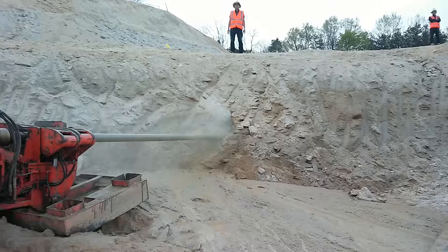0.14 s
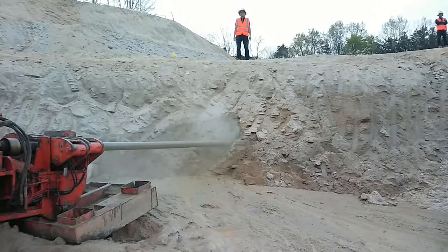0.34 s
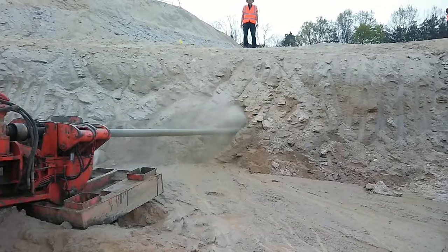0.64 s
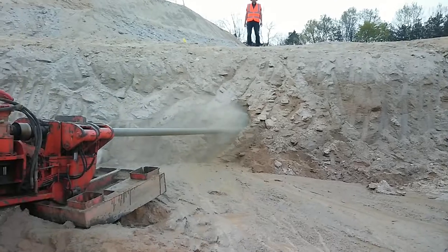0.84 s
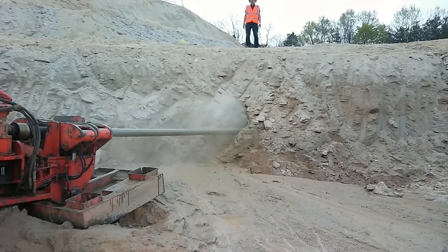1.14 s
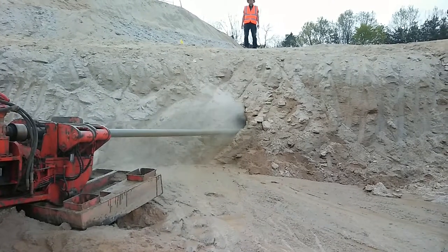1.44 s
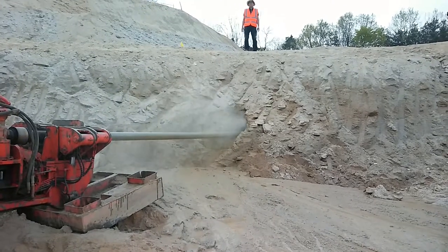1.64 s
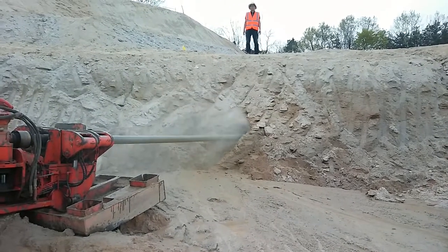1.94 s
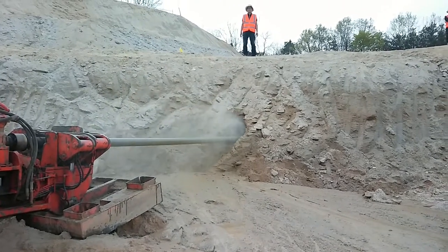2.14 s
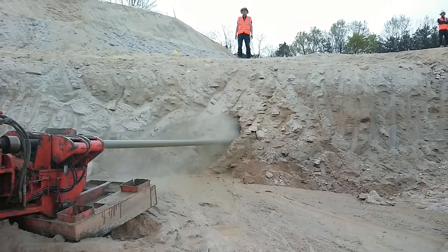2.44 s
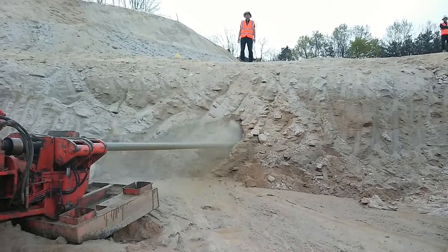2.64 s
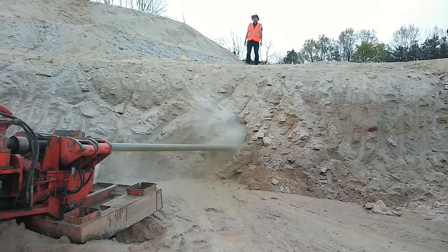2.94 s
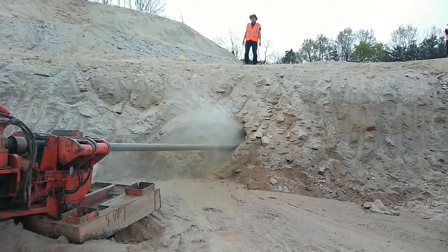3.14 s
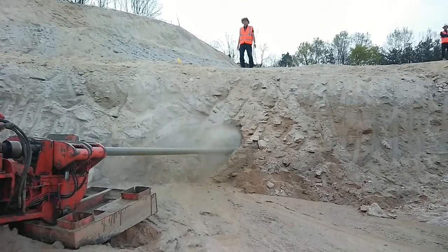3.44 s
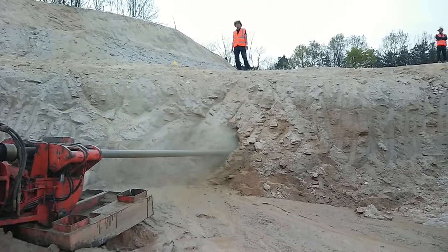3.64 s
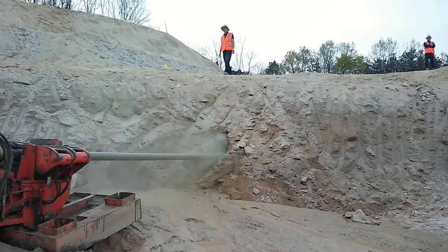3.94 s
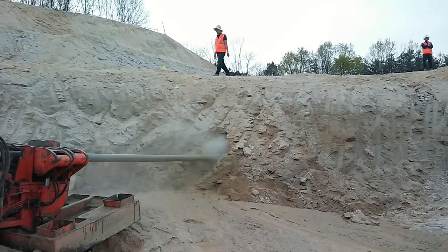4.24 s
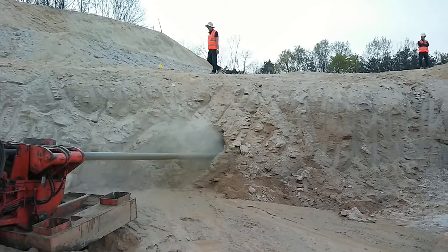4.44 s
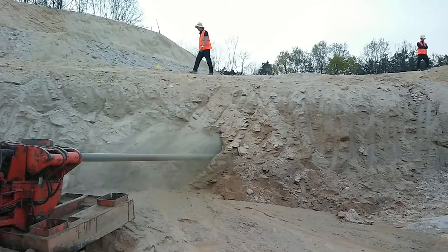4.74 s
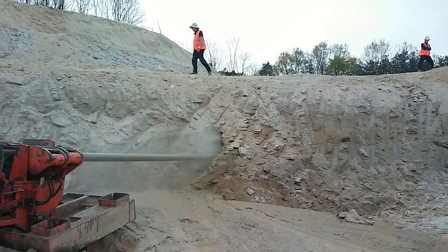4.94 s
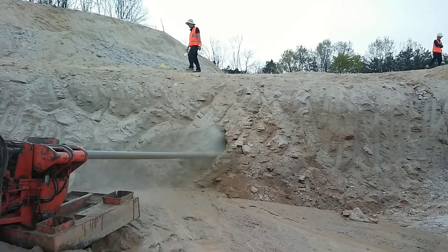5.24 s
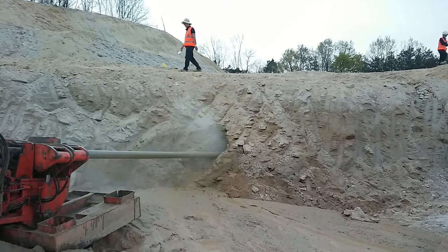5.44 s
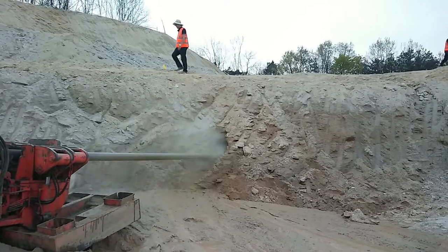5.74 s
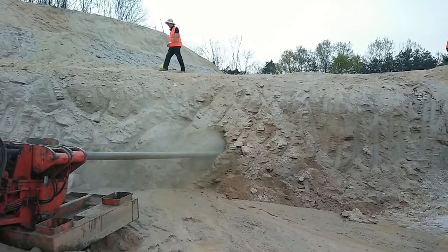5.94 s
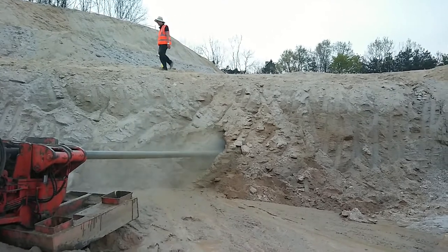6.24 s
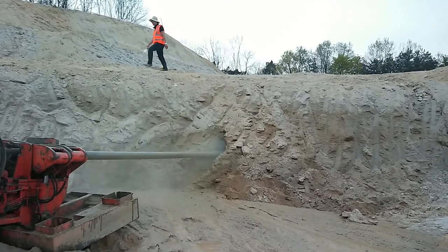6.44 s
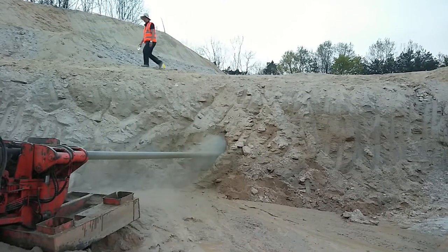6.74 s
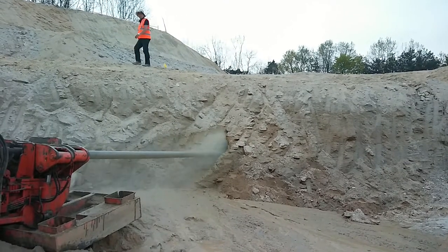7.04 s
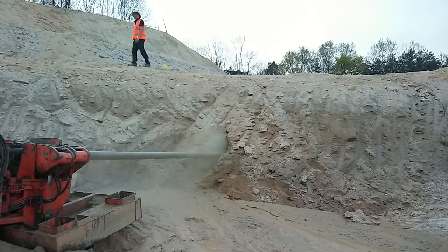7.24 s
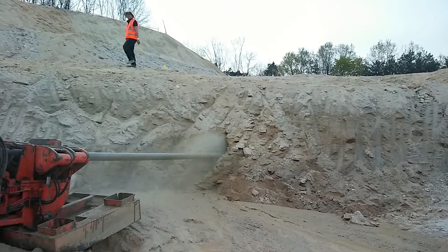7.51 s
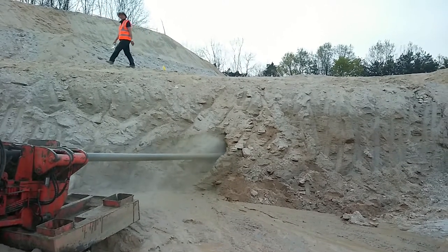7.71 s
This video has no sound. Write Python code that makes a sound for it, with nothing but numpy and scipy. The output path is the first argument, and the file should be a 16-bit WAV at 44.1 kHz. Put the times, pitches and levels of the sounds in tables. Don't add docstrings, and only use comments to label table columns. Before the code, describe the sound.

Starting abruptly, a drilling rig gives a loud continuous roar of compressed air and cuttings over a low diesel hum. Around three seconds the tone shifts, turning grittier and unsteady with short metallic squeals. After five seconds a rapid air hammer thuds underneath, booming deeper near the end. Open pit beside a rock face, one small mono microphone, limited and slightly distorted.

```python
import sys
import numpy as np
from scipy import signal
from scipy.fft import rfft, irfft, next_fast_len
from scipy.io import wavfile
from scipy.ndimage import uniform_filter1d, minimum_filter1d, map_coordinates

SR = 44100
rng = np.random.default_rng(int(sys.argv[2]) if len(sys.argv) > 2 else 0)


def persist_wave(psi):
    counts = np.round(np.clip(psi, -1, 1) * 32767).astype(np.int16)
    wavfile.write(sys.argv[1], SR, np.atleast_2d(counts).T)


def volts_from_decibels(level):
    exponent = np.asarray(level, float) / 20
    return 10 ** exponent


N = 347067

# (time [s], firing rate [Hz], level [dB])
ENGINE = [(.11, 71.5, -27), (.375, 70.3, -28), (.395, 71.1, -20.5), (1.5, 71.1, -21.5), (2.8, 70.3, -22),
          (3.2, 70.5, -20.5), (3.8, 70.34, -23.5), (4.3, 70.5, -24.5), (4.8, 70.1, -22.5), (5.3, 70.8, -24),
          (5.7, 69.9, -22.5), (6.3, 69.6, -33), (7, 67.65, -25.5), (7.87, 69.4, -21)]
# (time [s], level [dB])
FRAME_SHAKE = [(.11, -28), (.5, -22.5), (2.6, -24.5), (3.25, -24.5), (3.5, -18.5), (4, -26.5), (5.3, -23.5),
               (5.6, -25)]
# (frequency [Hz], level [dB per Hz])
FRAME_RUMBLE = [(60, -47), (85, 2.5), (130, -2.5), (180, 2), (240, -2), (330, -6.5), (450, -55)]
GROUND_RUMBLE = [(10, -26), (22, 11), (36, -5), (52, 7), (75, -4), (100, -34)]

# (time [s], pitch [Hz], length [s], level [dB])
SCRAPES = [(2.85, 950, .12, -18), (3.18, 1000, .07, -16), (3.54, 1300, .04, -13), (3.63, 1460, .07, -18),
           (3.68, 1950, .06, -21), (3.75, 4950, .1, -20), (3.74, 2130, .05, -21), (3.79, 2300, .05, -21),
           (3.84, 2450, .06, -21), (4.14, 900, .08, -17), (4.45, 1380, .08, -18), (4.56, 950, .08, -19),
           (4.74, 2200, .04, -20), (4.76, 970, .08, -18), (4.86, 1460, .06, -18), (4.86, 1700, .05, -20),
           (4.89, 2130, .04, -20), (5.03, 3900, .08, -21), (6.06, 4650, .12, -15), (6.3, 4950, .25, -20),
           (6.85, 1200, .12, -18), (7.6, 2100, .25, -22)]

# (time [s], piston cycles [Hz], force [dB])
HAMMER = [
    (5.34, 20.37, -24),
    (5.57, 19.9, -10),
    (5.8, 17.38, -9),
    (5.97, 16.51, -11),
    (6.45, 16.76, -12),
    (6.7, 17.5, -10),
    (7.1, 18.53, -10),
    (7.3, 18.8, -11),
    (7.87, 20.36, -10),
]
# (time [s], half length [s], extra level [dB])
SOLID_ROCK = [
    (5.662, 0.057, 12),
    (6.367, 0.065, 11),
    (6.72, 0.084, 7),
    (7.074, 0.063, 6),
    (7.55, .1, 6),
]
FIRST_STROKE_S = 5.3415
BORE_CLOSES_S, CLOSING_S = 7.29, 0.043

# (frequency [Hz], level [dB per Hz])
RING = [(700, -18), (820, -8.5), (900, -2), (980, 1), (1100, -3), (1200, -10)]
ROAR = [(1000, -11), (1120, -4), (1250, -3.5), (1380, -1.5), (1650, -7), (1850, -8), (2200, -26)]
LOW_MODE = [(240, -18), (320, -2), (480, 3), (620, -1), (730, -11.5), (850, -24)]
HIGH_MODE = [(1500, -24), (1850, -5.5), (2200, -2), (2700, -4), (3000, -11.5), (3500, -25)]
MODE_HZ = [980, 1350, 480, 2300]
# (from time [s], ring [dB], roar [dB], low [dB], high [dB])
HEARD = [
    (0, -24, -20.5, -25.5, -22),
    (3.15, -21.5, -22.5, -23.5, -21),
    (5.8, -21, -20.5, -27, -23),
    (7.58, -24.5, -31.5, -26.5, -20.5),
]
# (time [s], level [dB])
LOAD = [(.11, 1), (1, 0), (2, 0), (2.68, -0.5), (2.81, -2.5), (3.13, 0.5), (3.3, -2.5), (3.45, -1),
        (3.8, -0.5), (4.06, -0.5), (4.6, -1), (5.04, -2.5), (5.45, 0), (5.6, -6.5), (5.74, -6),
        (5.84, -0.5), (7.4, -0.5), (7.87, -1)]
# (time [s], pitch [Hz], length
# [s], swell [dB])
CATCHES = [(6.849, 475.5, 0.77, 4.5), (1.701, 1330, 0.2, 4.5), (2.83, 1120, 0.16, 8), (2.83, 480, 0.1, 5),
           (3.18, 980, 0.19, 4), (3.207, 480, 0.14, 11), (3.378, 480, 0.048, 0), (3.64, 980, .22, -7),
           (3.48, 980, 0.12, 2.5), (3.487, 480, 0.18, 4), (3.535, 1340, 0.14, 9.5),
           (3.734, 2300, 0.18, 3.5), (3.88, 1200, 0.12, 7.5), (4.126, 987, 0.22, 3.5),
           (4.33, 1054, 0.035, 13), (4.352, 2300, 0.08, 8), (4.445, 1130, 0.077, 14), (4.57, 1050, 0.17, 3),
           (4.712, 980, 0.15, 6), (4.853, 1450, 0.13, 8.5), (5.21, 1350, 0.089, 5), (5.318, 900, .1, 2),
           (5.466, 980, 0.053, 4), (6.02, 1350, 0.14, 4.5), (6.32, 1000, .1, 1), (6.445, 1210, 0.16, 1.5),
           (6.857, 1102, 0.29, 7), (7.196, 1030, 0.094, 2), (4.563, 2000, 0.15, -5), (4.85, 450, 0.11, 7)]
CATCH_RISE_S, CATCH_OCTAVES, SHIFT_S = 0.013, .35, 0.19
# (time [s], spread [dB])
UNREST = [(0, .7), (3, .8), (3.3, 1.7), (5.7, 1.8), (7.87, 1.3)]

# (time [s], air flow [dB], grit over the flow [dB])
JET = [(0.11, -11.5, -30.5), (0.37, -14, -31), (0.43, -13.5, -32), (1.13, -9.5, -33.5), (1.28, -13, -32),
       (3.05, -12.5, -33), (3.13, -12.5, -28.5), (3.35, -13.5, -21.5), (3.96, -11.5, -23.5),
       (4.28, -18, -21.5), (4.32, -12, -25), (4.69, -15, -20.5), (5.04, -10, -24), (5.36, -14.5, -22),
       (6.2, -14.5, -26.5), (7.46, -16, -28), (7.85, -16, -36), (7.87, -14, -26)]
# (frequency [Hz], level [dB per Hz])
HISS = [(2500, -18), (3000, -9.5), (3700, -4), (4700, -3.5), (5700, -6.5), (6600, -11.5), (7300, -38),
        (8500, -60)]
EDGE = [(6000, -7), (6800, 0), (7800, -5.5), (8800, -10), (9400, -23), (10500, -56)]
FIZZ = [(8000, -30), (9300, -0.5), (11000, -3.5), (12500, -3), (14000, -5.5), (15600, -11), (17000, -14)]
HISS_DB, EDGE_DB, FIZZ_DB = -1, 16.5, 0.5
CLEAN_DB, LEAN_PER_DB = -30, 0.6

# (delay [ms], gain [1])
ECHOES = [
    [(0.83, -0.07), (1.435, 0.05), (1.665, -0.05), (2.33, 0.04), (2.48, 0.06), (2.885, 0.06)],
    [(0.735, 0.06), (0.87, 0.05), (1.39, 0.04), (1.62, -0.04), (2.18, -0.09), (2.63, -0.04)],
    [(0.58, 0.06), (0.865, 0.13), (0.99, 0.06), (1.55, 0.06), (2.165, -0.09), (2.39, 0.09)],
]
MOVES_S = [
    3.13,
    5.75,
]
START_S, TOP_HZ = .1022, 15650


def unit(x):
    return x / np.sqrt(np.mean(x ** 2) + 1e-20)


def curves(rows):
    s, *cols = np.transpose(rows)
    return [np.interp(np.arange(N) / SR, s, c) for c in cols]


def wobble(rate):
    knots = rng.standard_normal(int(N * rate / SR) + 4)
    return map_coordinates(knots, [np.arange(N) * rate / SR])


def step(s, width_s):
    return .5 + .5 * np.tanh((np.arange(N) / SR - s) / width_s)


def filtered(x, response):
    m = next_fast_len(N + SR // 2)
    return irfft(rfft(x, m) * response(np.fft.rfftfreq(m, 1 / SR)), m)[..., :N]


def rush(spectrum, patchy_db, lean_db=0):
    hz, db = np.transpose(spectrum)
    f, t, z = signal.stft(rng.standard_normal(N), SR, nperseg=1024)
    patches = uniform_filter1d(rng.standard_normal(z.shape), size=6, axis=0)
    patches = unit(uniform_filter1d(patches, size=8, axis=1))

    def per_frame(v):
        return np.interp(t * SR, np.arange(N), v + np.zeros(N))

    octaves = np.log2((f[:, None] + 1) / np.sqrt(hz[0] * hz[-1]))
    lean = per_frame(lean_db) * np.clip(octaves, -1, 1)
    z = z * volts_from_decibels(per_frame(patchy_db) * patches + lean)
    x = signal.istft(z, SR, nperseg=1024)[1][:N]
    return unit(filtered(x, lambda f: volts_from_decibels(np.interp(np.log(f + 1), np.log(hz), db, -120, -120))))


def engine():
    hz, db = curves(ENGINE)
    phase = 2 * np.pi * np.cumsum(hz) / SR + .2 * wobble(14)
    hum = np.sin(phase) + volts_from_decibels(-12.5) * np.sin(phase / 2)
    tone = np.sqrt(2) * volts_from_decibels(db + 0.27 * wobble(14)) * hum
    frame_db = curves(FRAME_SHAKE)[0] + wobble(7)
    ground_db = -31.5 - 2.5 * wobble(7.4)
    frame = volts_from_decibels(frame_db) * rush(FRAME_RUMBLE, patchy_db=1.0)
    ground = volts_from_decibels(ground_db) * rush(GROUND_RUMBLE, patchy_db=3.0)
    return tone + frame + ground


def scrapes():
    total = np.zeros(N + SR)
    for s, hz, length, db in SCRAPES:
        t = np.arange(round(2 * length * SR)) / SR
        u = t / length
        swell = 2 * u * np.exp(1 - 4 * u ** 1.5)
        drift = map_coordinates(rng.standard_normal(int(.2 * hz * length) + 4), [.1 * hz * t])
        squeal = np.sin(2 * np.pi * hz * t + 1.3 * drift)
        total[round(s * SR):][:len(t)] += volts_from_decibels(db + 4) * swell * squeal
    return total[:N]


def piston():
    running = np.arange(N) >= FIRST_STROKE_S * SR
    return np.cumsum(curves(HAMMER)[0] * running) / SR


def thump(blows, hz, t60, rise_s):
    t = np.arange(SR // 10) / SR
    shape = -np.sin(2 * np.pi * hz * t) * volts_from_decibels(-60 * t / t60) * (1 - np.exp(-t / rise_s))
    return signal.fftconvolve(blows, shape / np.abs(shape).max())[:N]


def hammer():
    t, thud_db = np.arange(N) / SR, curves(HAMMER)[1]
    knock_db = thud_db - 6 + sum(db * np.exp(-((t - s) / half) ** 2) for s, half, db in SOLID_ROCK)
    boom_db = thud_db - 16.5 + 19 * step(BORE_CLOSES_S, CLOSING_S)
    halves = np.ceil(2 * piston())
    at = np.flatnonzero(np.diff(halves)) + 1
    strokes = np.zeros(N)
    strokes[at] = volts_from_decibels(1.4 * wobble(40)[at] - 3.5 * (1 - halves[at] % 2))
    blows = strokes * (halves % 2)
    thud = thump(volts_from_decibels(thud_db) * strokes, hz=132, t60=.027, rise_s=.002)
    knock = thump(volts_from_decibels(knock_db) * np.roll(blows, 30), hz=205, t60=.045, rise_s=.002)
    boom = thump(volts_from_decibels(boom_db) * blows, hz=100, t60=.1, rise_s=.002)
    ground = thump(volts_from_decibels(boom_db - 15) * strokes, hz=40.0, t60=0.19, rise_s=.003)
    return thud + knock + boom + ground


def mode_levels():
    moves, *modes = np.transpose(HEARD)
    level = []
    for db in modes:
        changes = sum(d * step(s, SHIFT_S / 2) for s, d in zip(moves[1:], np.diff(db)))
        level.append(db[0] + changes)
    level = np.array(level) + curves(LOAD)[0]
    t = np.arange(N) / SR
    for s, hz, length, db in CATCHES:
        u = t[:round(3 * length * SR)]
        swell = (1 - np.exp(-u / CATCH_RISE_S)) * np.exp(-(u / length) ** 2)
        near = np.exp(-(np.log2(hz / np.array(MODE_HZ)) / CATCH_OCTAVES) ** 2)
        part = level[:, round(s * SR):][:, :len(u)]
        part += db * near[:, None] * swell[:part.shape[1]]
    return level


def pipe(surge):
    unrest = curves(UNREST)[0]
    total = np.zeros(N)
    for db, spectrum in zip(mode_levels(), (RING, ROAR, LOW_MODE, HIGH_MODE)):
        flutter_db = 1.14 * wobble(35) + 0.5 * unrest * wobble(9)
        total += volts_from_decibels(db + flutter_db) * rush(spectrum, patchy_db=1.08 * unrest)
    return volts_from_decibels(.5 * surge) * total


def jet(surge):
    db, grit_db = curves(JET)
    edge = volts_from_decibels(grit_db + EDGE_DB) * rush(EDGE, patchy_db=1.2)
    crackle = unit(volts_from_decibels(1.0 * wobble(300)) * rush(FIZZ, patchy_db=-1.5))
    fizz = volts_from_decibels(grit_db + FIZZ_DB) * crackle
    lean_db = LEAN_PER_DB * (grit_db - CLEAN_DB) + 0.61 * wobble(8)
    hiss = volts_from_decibels(0.27 * wobble(7.6)) * rush(HISS, patchy_db=curves(UNREST)[0], lean_db=lean_db)
    return volts_from_decibels(db + HISS_DB + 1.17 * surge) * (hiss + edge + fizz)


def echoes(x, strength):
    t = np.arange(N) / SR
    first, second = (np.clip((t - s) / 0.12 + .5, 0, 1) for s in MOVES_S)

    def comb(taps):
        def response(hz):
            delayed = sum(g * np.exp(-2j * np.pi * hz * ms / 1000) for ms, g in taps)
            return 1 + strength / (1 + (hz / 9000) ** 4) * delayed
        return response

    shares = (1 - first, first - second, second)
    return sum(share * filtered(x, comb(taps)) for share, taps in zip(shares, ECHOES))


def scene():
    cycles = piston()
    puffs = .4 * (cycles > 0) * np.cos(2 * np.pi * cycles)
    surge = .3 * wobble(9.9) + 1.3 * wobble(32) + puffs
    mono = echoes(jet(surge) + pipe(surge), strength=1.3)
    mono = mono + scrapes() + engine() + hammer()
    return np.array([mono, mono])


def roll_off(x):
    return signal.sosfilt(signal.butter(12, 15640, fs=SR, output="sos"), x)


def record(dry):
    x = volts_from_decibels(5.5) * filtered(dry, lambda hz: (hz < TOP_HZ) * 1j * hz / (11 + 1j * hz))
    need = np.minimum(1, 1.01 / (np.abs(x) + 1e-9))
    gain = uniform_filter1d(minimum_filter1d(need, size=401), size=401)
    since = np.arange(N) / SR - START_S
    opening = (since >= 0) * volts_from_decibels(7 * np.exp(-np.abs(since) / .003))
    return roll_off(np.clip(x * gain * opening, -1, 1))


dry = scene()
out = record(dry)
persist_wave(out)
```